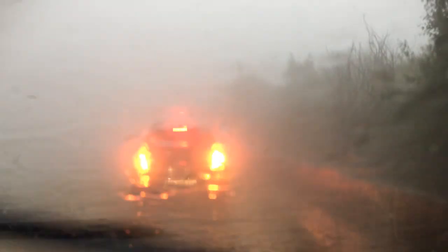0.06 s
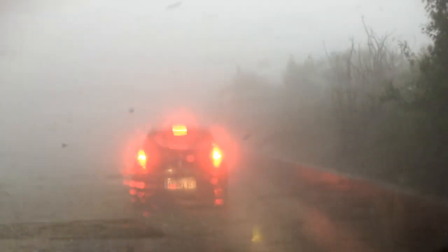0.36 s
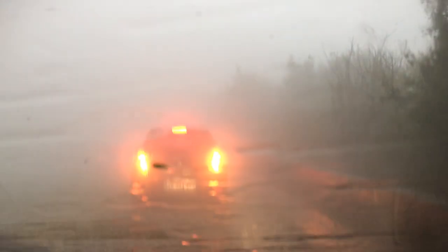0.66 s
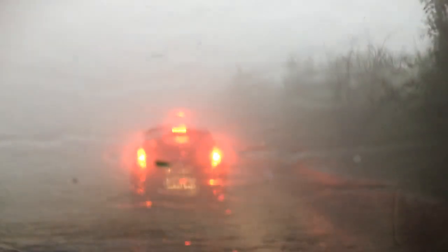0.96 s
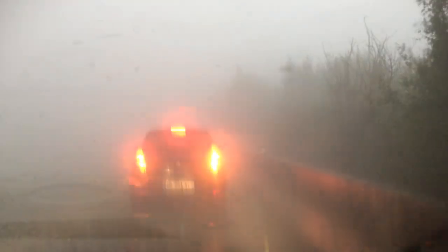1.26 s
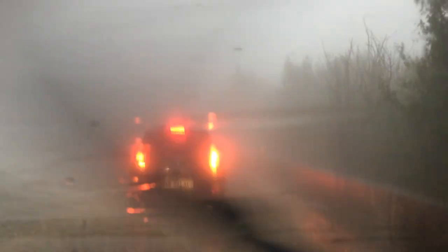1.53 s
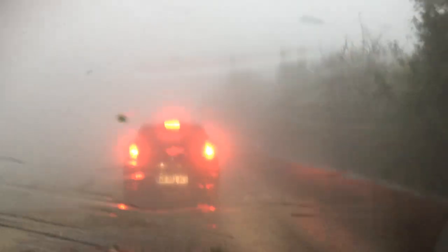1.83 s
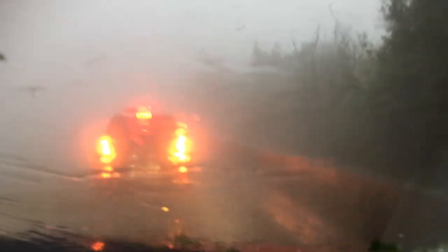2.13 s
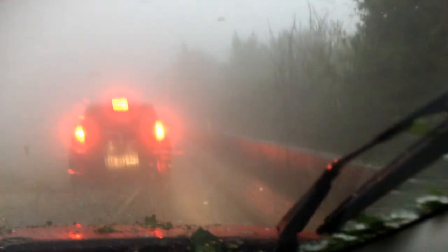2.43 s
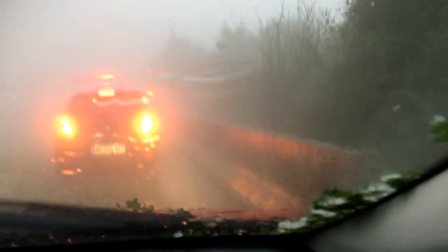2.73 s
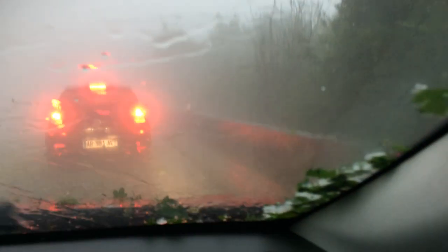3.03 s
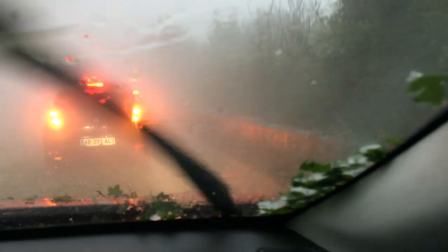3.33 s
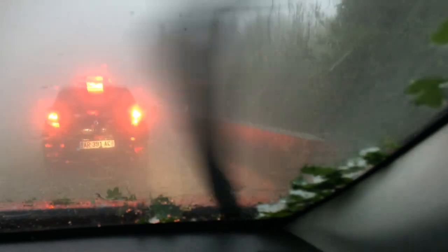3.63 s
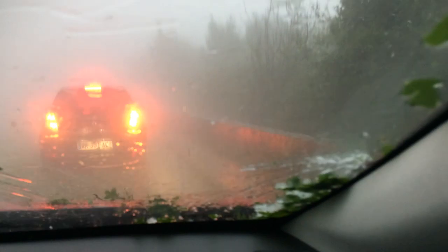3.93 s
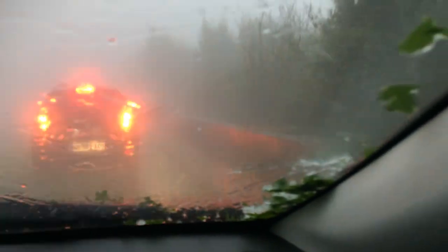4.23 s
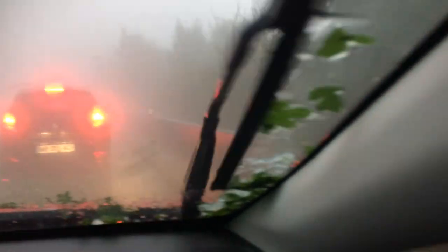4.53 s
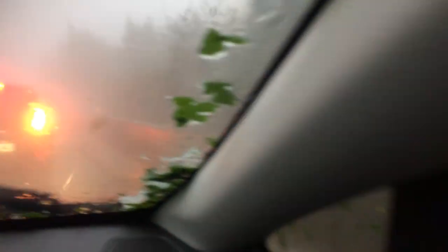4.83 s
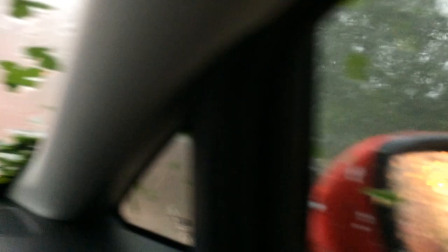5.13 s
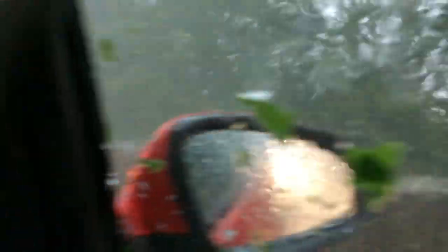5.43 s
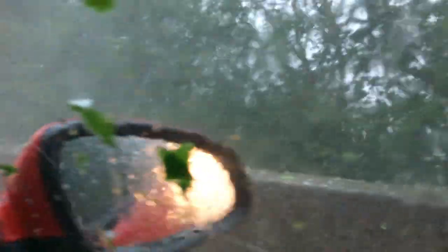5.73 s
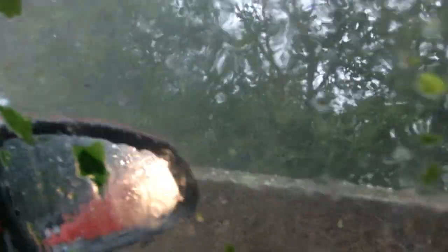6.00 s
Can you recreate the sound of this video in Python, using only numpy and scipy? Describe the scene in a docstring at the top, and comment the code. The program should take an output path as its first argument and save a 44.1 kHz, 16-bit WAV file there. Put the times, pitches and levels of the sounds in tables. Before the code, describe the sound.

Hail pelts a slowly moving car, heard from the front seat of the small, dead cabin. Big stones crack irregularly on glass and sheet metal and set the roof booming, while small ones patter and ice chips click in between. Tyres rumble steadily under a hiss of rain. The rain and fine hail ease, then surge, and near the end the tone shifts slightly as the microphone turns to the side window.

```python
"""In the front seat of a slowly moving car, hail falls over tyre rumble and the hiss of rain.
Each stone cracks on glass or sheet metal; the big ones set the roof booming into the small, dead cabin.
Small stones patter and chips of ice click in between. Near the end the microphone turns to the side
window, which changes the tone a little. A limiter flattens the hardest blows."""
import sys
import numpy as np
from scipy import signal
from scipy.fft import rfft, irfft
from scipy.io import wavfile
from scipy.ndimage import uniform_filter1d, minimum_filter1d

SR = 44100
rng = np.random.default_rng(int(sys.argv[2]) if len(sys.argv) > 2 else 0)


def master(y):
    """Save y as 16-bit WAV."""
    cut = np.clip(np.atleast_2d(y).T, -1, 1)
    pcm = np.round(cut * 32767)  # scale
    wavfile.write(sys.argv[1], SR, pcm.astype(np.int16))


N = 276066

# The tone of tyres, engine and rain together (frequency [Hz], level [dB])
ROAD_AND_RAIN_TONE = [(15, -47), (25, -32), (82, 4), (160, 8.5), (305, -18), (523, -11), (722, -19),
                      (919, -20), (1620, -21.5), (2300, -23), (6380, -34.5), (12500, -45.5), (14300, -53),
                      (15500, -57)]
# How hard the rain and fine hail come down (time [s], level [dB])
SHOWER_LEVELS = [(0, 1), (.75, -1.5), (1.6, -4.5), (2.4, -6), (3.2, -7), (4.0, 2.5), (4.5, -6), (4.7, 7),
                 (5.0, 2), (5.3, -0.5), (5.7, 0.5), (6.26, 1.5)]
# One row for each big hailstone (time [s], strength [dB], hardness [dB per octave],
# frequency emphasised in the hit's tone [Hz], ring length [factor], boom level [dB], roof pitch [Hz])
BIG_STONES = [(0.009, -24.5, -0.5, 1100, 1.9, -43, 140), (0.049, -31, -0.0, 437, 0.88, -20.5, 135),
              (0.119, -17.5, 1.2, 2540, 0.97, -20.5, 103), (0.143, -25.5, 2.0, 790, 3.2, -29, 184),
              (0.197, -21, -2, 1830, 1.33, -20, 153), (0.261, -20, -3, 954, 1.2, -11, 138),
              (0.313, -33, 1.1, 480, 1, -46, 169), (0.333, -23, 1.5, 1130, 1.2, -16, 158),
              (0.383, -44.5, 5, 2340, 0.83, -26.5, 155), (0.4503, -24.5, -0.8, 623, 1.36, -23, 158),
              (0.485, -21, -2, 833, 1.23, -18.5, 276), (0.512, -16.5, -2, 2590, 1.8, -20, 200),
              (0.556, -25, 2.5, 810, 0.65, -21, 223), (0.578, -25, -1, 484, 1.03, -17.5, 190),
              (0.623, -20, 2, 2480, 1.38, -23, 185), (0.6576, -16, -3.5, 2640, 1.24, -23, 148.7),
              (0.77, -42.5, 4.5, 6900, 0.91, -42, 269), (0.83, -18, -0.5, 1690, 2.0, -18, 119),
              (0.874, -17.5, -0.9, 2510, 1.75, -20, 153), (0.911, -19.5, 1.2, 337, 1.4, -16.5, 177),
              (0.95, -22, 0.2, 526, 1.58, -19, 128), (0.995, -53, -5, 360, 0.51, -21.5, 154),
              (1.032, -35, -2, 589, 3.5, -26, 156), (1.061, -27, -0.4, 6970, 1.94, -20, 175),
              (1.124, -38.5, -2, 460, 6.4, -25.5, 214), (1.1821, -18.5, -0.8, 610, 0.69, -18.5, 163),
              (1.234, -33, -4, 1440, 1.15, -26, 137), (1.278, -34.5, -2.8, 830, 1.9, -22, 179),
              (1.316, -25, -6, 7200, 1.64, -15.5, 148.5), (1.391, -31, -2.5, 1566, 3.7, -27, 178.6),
              (1.4458, -24.5, 0, 6970, 1.35, -20, 194), (1.458, -14, -0.4, 2600, 1.35, -21.5, 164),
              (1.514, -36, -1.5, 2640, 3.8, -32, 196), (1.578, -25, 0.6, 4330, 0.9, -15.5, 157),
              (1.71, -26.5, -2.2, 480, 1.03, -18, 130), (1.77, -26, -2, 453, 1.12, -33, 138.5),
              (1.8412, -21.5, 0.2, 337, 1.2, -28, 214), (1.856, -20, -1.2, 2540, 2.7, -21.5, 160),
              (1.887, -34, -10, 820, 0.65, -15.5, 158), (1.898, -26, 3.5, 4560, 0.9, -28, 159),
              (1.931, -25, -2, 823, 1.37, -24.5, 214), (2.009, -16.5, -2, 6800, 1.44, -22.5, 190),
              (2.043, -29, 1.5, 4570, 0.66, -22, 204), (2.118, -28.5, 3.5, 4610, 0.92, -35, 113),
              (2.149, -30, -1.0, 824, 0.81, -23, 113), (2.184, -28.5, 2, 7050, 1.7, -37.5, 191),
              (2.201, -20, 0.4, 1780, 1.18, -51, 161), (2.248, -27, -0.7, 2520, 0.71, -32, 107),
              (2.271, -24.5, 1, 775, 1.4, -13.5, 170), (2.296, -35, -6.5, 794, 3.3, -22.5, 161.4),
              (2.3678, -42, -3, 350, 1, -26.5, 172), (2.425, -37.5, -4.0, 590, 1.3, -58, 143),
              (2.504, -24.5, -3.5, 874, 1.4, -14.5, 167), (2.583, -27.5, -5.5, 2880, 3.8, -16, 174.5),
              (2.634, -17.5, 1.4, 960, 1.34, -21, 170.5), (2.673, -28.5, 1.5, 713, 2.6, -25, 164),
              (2.725, -19.5, -1.6, 2240, 1.66, -23, 142), (2.771, -19.5, -2.0, 880, 0.85, -20.5, 129),
              (2.787, -24, 3, 3540, 1.18, -19, 170), (2.852, -32, 1.7, 650, 2, -23.5, 162),
              (2.883, -28, -2.5, 930, 1.34, -25, 182), (2.926, -31.5, -6, 2480, 4.9, -20, 204.5),
              (2.954, -19.5, 0.4, 2950, 1.17, -16, 168), (2.984, -28.5, -2.1, 583, 1.7, -52, 156),
              (3.061, -19, -0.5, 2297, 1.55, -15.5, 141.5), (3.104, -45.5, -9.5, 342, 1.46, -21.5, 148.7),
              (3.189, -34.5, -4, 437, 1.6, -25.5, 164), (3.209, -19.5, 0, 992, 2.7, -41, 269),
              (3.24, -25.5, 3.5, 4560, 1.2, -23.5, 158), (3.284, -25, 7.5, 5100, 0.93, -21.5, 169),
              (3.41, -31, 5.5, 910, 0.78, -40, 114), (3.464, -18.5, 0.3, 2660, 1.3, -24, 163),
              (3.5023, -13.5, 1, 6120, 1.31, -23, 121), (3.551, -48.5, 9, 5830, 0.69, -50.5, 138),
              (3.613, -21.5, -1.3, 334, 2.16, -12, 167), (3.679, -25.5, 1.5, 2230, 1.43, -16, 156),
              (3.709, -25.5, 3.0, 4480, 2.2, -30, 134), (3.738, -20, -4.5, 1960, 1.48, -19, 191),
              (3.805, -24, 2, 446, 0.96, -13.5, 196), (3.883, -17, -1.5, 2720, 1.03, -21, 178.2),
              (3.995, -25, 3, 3470, 0.98, -29, 207), (4.068, -39, 3.5, 4190, 3.7, -28.5, 118.3),
              (4.088, -39.5, -3, 602, 2.6, -24, 188), (4.239, -25, 0.9, 473, 1, -5.5, 122.8),
              (4.253, -28, 1.8, 358, 1.7, -11.5, 137.4), (4.302, -18.5, 2.1, 740, 0.98, -14, 132.4),
              (4.351, -33.5, 0.5, 5500, 2.35, -25.5, 134.5), (4.403, -42, -3, 456, 1.8, -33, 148),
              (4.553, -47, 6, 6760, 0.56, -54, 164), (4.618, -38, -3.7, 676, 2.2, -36, 127.5),
              (4.675, -44.5, 5.5, 6970, 1.4, -40, 154), (4.89, -30.5, -1.3, 880, 2.3, -7, 132.7),
              (5.009, -21.5, 0, 880, 1, -34, 137), (5.052, -20.5, -2.8, 2610, 1, -33.5, 172),
              (5.159, -25, -0.9, 3100, 0.78, -29, 155), (5.3441, -24.5, -0.6, 2360, 2.7, -25.5, 129),
              (5.439, -22.5, 1.25, 337, 3.1, -23, 145), (5.51, -21, -1.8, 2700, 1.8, -27, 114.6),
              (5.604, -33, 0.9, 603, 3, -28.5, 186), (5.638, -18, 1, 365, 2.13, -27.5, 111.6),
              (5.747, -37, 3.5, 6900, 1.6, -25, 264), (5.763, -19, 0.6, 350, 1.38, -24, 163),
              (5.876, -17.5, 0.9, 2620, 1.18, -17, 122), (5.904, -28.5, -6, 1770, 1.25, -13, 159),
              (5.971, -17, -1.5, 2490, 0.78, -19, 161), (6.062, -19.5, 1.3, 2880, 1.04, -31.5, 179.7),
              (6.116, -47, 8.5, 5270, 0.7, -48, 166), (6.227, -22.5, 1.5, 3120, 1.36, -25, 128)]
# The four parts of a hit, from low to high: knock, clack, crack and fizz (low edge [Hz],
# high edge [Hz], base time to fade by 60 dB [s], rise time [s], first snap [factor], level [dB])
HIT_PARTS = [(274, 853, 0.13, 0.00088, 0.22, 0.25), (759, 2240, 0.082, 0.0011, 0.63, 0),
             (2310, 6000, 0.064, 0.0011, 1.15, -5), (6220, 12600, 0.066, 0.00055, 1.43, -14.5)]
# The tone of the car's body, heard from inside (frequency [Hz], level [dB])
BODY_TONE = [(200, 4), (300, -2), (400, -3.5), (560, -5), (720, -10), (830, -14), (1030, -11.5),
             (1300, -14.5), (1650, -16.5), (2300, -20.5), (3900, -24), (7500, -31.5), (12000, -41.5),
             (15500, -37.5)]
# Ice chips on the glass close by, alone or splitting off a big stone (time [s], strength [dB])
ICE_CHIPS = [(0.625, -27), (0.875, -31), (0.949, -30.5), (1.032, -44), (1.043, -47), (1.166, -39),
             (2.964, -25.5), (3.228, -31), (3.284, -20), (3.710, -31), (4.759, -39), (4.778, -40),
             (4.843, -43), (4.979, -49), (5.422, -38), (6.080, -33)]
# How the tone changes when facing the side window (frequency [Hz], level change [dB])
SIDE_WINDOW_TONE = [(120, -1), (200, 1.5), (300, 1), (420, -0.5), (620, -2.5), (850, 0), (1150, -1.5),
                    (1600, 2), (2200, 2), (3300, 0), (7000, 0), (12000, -0.5)]

CABIN_NOTES_HZ = [134, 162, 193.3]  # the low notes at which the cabin likes to ring
BOOM_HZ, SWELL_S = 164.5, 0.014  # a typical boom: its pitch and the time it takes to swell
HIT_SAMPLES = 16384
HIT_T, HIT_HZ = np.arange(HIT_SAMPLES) / SR, np.fft.rfftfreq(HIT_SAMPLES, 1 / SR)  # axes of one hit


def amp(db):
    """Turns decibels into a number to multiply a sound by."""
    return 10 ** (np.asarray(db) / 20)


def rms(x):
    """The average size of a signal (root mean square)."""
    return np.sqrt(np.mean(x ** 2) + 1e-20)


def unit(x):
    """Scales a signal to an average size of 1."""
    return x / rms(x)


def tone_gains(table, hz):
    """Reads a tone table as a gain for each frequency in hz."""
    table_hz, db = np.transpose(table)
    return amp(np.interp(np.log(hz + 1), np.log(table_hz + 1), db))


def band(low_hz, high_hz, order=12):
    """Gains that keep one frequency range of a hit; a higher order gives steeper edges."""
    return 1 / np.sqrt((1 + (low_hz / (HIT_HZ + 1)) ** order) * (1 + (HIT_HZ / high_hz) ** order))


def wobble(length, size):
    """A smooth random curve that changes about every size steps."""
    return unit(uniform_filter1d(uniform_filter1d(rng.standard_normal(length), size), size))


def add(mix, start_s, sound):
    """Mixes a sound in at the given time."""
    part = mix[max(round(start_s * SR), 0):][:len(sound)]
    part += sound[:len(part)]


def shower_db(t):
    """How strong the shower is at the times t."""
    return np.interp(t, *np.transpose(SHOWER_LEVELS))


def tyres_and_rain(level_db=-35):
    """The tyres rumble steadily; above them the hiss of rain rises and falls with the shower."""
    frames, hz = N // 256 + 5, np.fft.rfftfreq(1024, 1 / SR)
    real, imag = rng.standard_normal((2, frames, len(hz)))
    rain_db = shower_db(np.linspace(0, N / SR, frames))[:, None] * hz / (hz + 300)  # spares the bass
    spectra = (real + 1j * imag) * tone_gains(ROAD_AND_RAIN_TONE, hz) * amp(rain_db)
    noise = signal.istft(spectra.T, nperseg=1024, noverlap=768)[1][:N]
    return amp(level_db) * unit(noise)


def burst(gains, envelope):
    """A struck panel rings at so many notes that it sounds like noise; the envelope shapes its level."""
    noise = irfft(gains * np.exp(2j * np.pi * rng.random(len(gains))))
    return unit(noise * envelope) * rms(envelope)


def first_touch(gains, envelope, level_db=-13):
    """Ice meets the panel with one clean pulse, weaker than the ringing after it."""
    pulse = np.roll(irfft(gains), 64)
    return amp(level_db) * unit(pulse) * rms(envelope)


def short_ring(emphasis_hz, level_db=-6, dull_hz=1500, fade_s=0.03):
    """Two notes ring briefly, at and just below the emphasised frequency; low ones ring more clearly."""
    phase = 2 * np.pi * emphasis_hz * HIT_T
    pair = np.sin(phase) + .5 * np.sin(phase * rng.uniform(.88, .94))
    return amp(level_db) * pair * np.exp(-HIT_T / fade_s) / (1 + (emphasis_hz / dull_hz) ** 2)


def part_level_db(centre_hz, strength_db, hardness, emphasis_hz, pivot_hz=1354, lift_db=6):
    """One part's level: harder hits are brighter, and parts near the emphasised frequency are louder."""
    nearness = np.exp(-np.log2(centre_hz / emphasis_hz) ** 2)
    return strength_db + hardness * np.log2(centre_hz / pivot_hz) + lift_db * nearness


def ice_hit(strength_db, hardness, emphasis_hz, ring_length, sharpness=1, snap_s=0.0051, rattle_s=0.014):
    """Ice strikes with a hard snap, then the panel rings on, longest in the low notes."""
    emphasis_db = 6.5 / (1 + ((HIT_HZ / emphasis_hz - 1) / 0.38) ** 2)
    body = tone_gains(BODY_TONE, HIT_HZ) * amp(emphasis_db)
    # each hit wakes some notes and misses others; high up they crowd together and even out
    body *= amp(3.2 * wobble(len(HIT_HZ), size=36) / (1 + HIT_HZ / 16000))
    # after the first touch, splinters and echoes off the windows arrive in clumps
    clatter = amp(3.1 * wobble(HIT_SAMPLES, size=50) * (1 - np.exp(-HIT_T / .003)))
    # the shattered ice rattles hardest a moment after the blow
    clatter *= 1 + 0.44 * HIT_T / rattle_s * np.exp(1 - HIT_T / rattle_s)
    out = np.zeros(HIT_SAMPLES)
    for low_hz, high_hz, fade_s, rise_s, snap, gain_db in HIT_PARTS:
        fade = (1 - np.exp(-HIT_T / rise_s)) * amp(-60 * HIT_T / (fade_s * ring_length))
        envelope = fade * (1 + sharpness * snap * np.exp(-HIT_T / snap_s))
        gains = body * band(low_hz, high_hz)
        part = burst(gains, unit(envelope * clatter) * rms(envelope))
        part += snap * first_touch(gains, envelope)
        if low_hz <= emphasis_hz < high_hz:
            part = 1.267 * part + short_ring(emphasis_hz) * fade
        level_db = part_level_db(np.sqrt(low_hz * high_hz), strength_db, hardness, emphasis_hz)
        out += amp(level_db + gain_db) * part
    return out


def cabin_pitch(roof_hz, pull=0.6):
    """The cabin pulls the roof's pitch part of the way to its own nearest note."""
    nearest_hz = min(CABIN_NOTES_HZ, key=lambda note_hz: abs(note_hz - roof_hz))
    return roof_hz + pull * (nearest_hz - roof_hz)


def roof_boom(pitch_hz, swell_s, thud_db=-6, push_db=-15):
    """The roof flexes with a short thud and a deep push; one low cabin note builds up and dies away."""
    peaks_s = max(swell_s, .005), min(swell_s, .026)
    note_shape, thud_shape = (HIT_T / peak_s * np.exp(1 - HIT_T / peak_s) for peak_s in peaks_s)
    # energy passes between neighbouring notes, so the pitch wanders
    cycles = np.cumsum(pitch_hz * (1 + .035 * wobble(HIT_SAMPLES, size=700))) / SR
    note = np.sqrt(2) * np.sin(2 * np.pi * cycles) * note_shape
    thud = burst(band(105, 270) * band(pitch_hz / 2, pitch_hz * 1.5), thud_shape)
    push = burst(band(70, 70, order=6), thud_shape)
    return note + amp(thud_db) * thud + amp(push_db) * push


def big_stones(boom_lift_db=1.07):
    """Each big hailstone cracks on the car and sets the roof booming."""
    out = np.zeros(N)
    for start_s, strength_db, hardness, emphasis_hz, ring_length, boom_db, roof_hz in BIG_STONES:
        sharpness = np.exp(0.039 * hardness)  # a harder blow snaps more sharply
        add(out, start_s, ice_hit(strength_db, hardness, emphasis_hz, ring_length, sharpness))
        # the boom swells more slowly when it is low or the hit rings long
        swell_s = SWELL_S * (BOOM_HZ / roof_hz) ** 0.9 * np.sqrt(ring_length)
        add(out, start_s, amp(boom_db + boom_lift_db) * roof_boom(cabin_pitch(roof_hz), swell_s))
    return out


def patter(base_db=-42, spread_db=9.5, fade_s=0.065, rise_s=0.0017, kinds=24, hits_per_s=240):
    """Small stones and drops tick at random, some dull and some bright, louder as the shower grows."""
    snap = 1 + 0.41 * np.exp(-HIT_T / 0.00065)
    envelope = (1 - np.exp(-HIT_T / rise_s)) * amp(-60 * HIT_T / fade_s) * snap
    body = tone_gains(BODY_TONE, HIT_HZ)
    out = np.zeros(N)
    for tick_hz in np.geomspace(500, 8000, kinds):
        sizes = amp(spread_db * np.minimum(rng.exponential(1, N), 3))
        lands = rng.random(N) < hits_per_s / kinds / SR
        tick = burst(body * band(tick_hz / 1.73, tick_hz * 2.66, order=4), envelope)
        out += signal.oaconvolve(sizes * lands, tick)[:N] * tick_hz ** -.15  # high ticks are quieter
    return amp(base_db + shower_db(np.arange(N) / SR)) * unit(out)


def ice_chips(faint_db=-53, faint_count=45):
    """Chips of ice click on the glass, bright and very short; fainter ones skitter about at random."""
    faint = [(start_s, faint_db) for start_s in rng.uniform(0, N / SR, faint_count)]
    out = np.zeros(N)
    for start_s, strength_db in ICE_CHIPS + faint:
        add(out, start_s, ice_hit(strength_db, hardness=4.7, emphasis_hz=5500, ring_length=0.27))
    return out


def roof_taps(knock_db=-44, boom_db=-37, spread_db=1.5, count=40):
    """Medium stones land at random on the lined roof: dull knocks, each with a small boom."""
    out = np.zeros(N)
    for when, size, shift, detune in rng.uniform(-0.92, 1, (count, 4)):
        start_s = (when + 1) / 2 * N / SR
        knock = ice_hit(knock_db, hardness=-3, emphasis_hz=600 * 2 ** (shift / 2), ring_length=0.4)
        boom = amp(boom_db) * roof_boom(BOOM_HZ * (1 + 0.16 * detune), SWELL_S)
        add(out, start_s, amp(spread_db * size) * (knock + boom))
    return out


def turn_to_side_window(sound, from_s=5, to_s=5.9):
    """The microphone turns away from the windscreen, so the tone fades to that of the side window."""
    at_side = irfft(rfft(sound) * tone_gains(SIDE_WINDOW_TONE, np.fft.rfftfreq(N, 1 / SR)), N)
    share = np.interp(np.arange(N) / SR, [from_s, to_s], [0, 1])
    return sound + share * (at_side - sound)


def scene():
    """Hail of every size over tyres and rain, heard in one channel by the turning microphone."""
    hail = big_stones() + roof_taps() + patter() + ice_chips()
    return turn_to_side_window(tyres_and_rain() + hail)[None]


def record(dry, ceiling=0.7, recovery_db_per_s=1200, window_samples=40, cutoff_hz=15600):
    """A limiter dips the level just ahead of each loud peak; then a filter cuts the highest treble."""
    over_db = 20 * np.log10(np.maximum(abs(dry[0]) / ceiling, 1))
    recovery_db = np.arange(N) / SR * recovery_db_per_s
    gain = amp(recovery_db - np.maximum.accumulate(over_db + recovery_db))
    smooth_gain = uniform_filter1d(minimum_filter1d(gain, window_samples), window_samples)
    low_pass = signal.firwin(255, cutoff_hz, window=("kaiser", 9), fs=SR)
    return signal.oaconvolve(dry * smooth_gain, low_pass[None], "same")


dry = scene()
out = record(dry)
master(out)
```